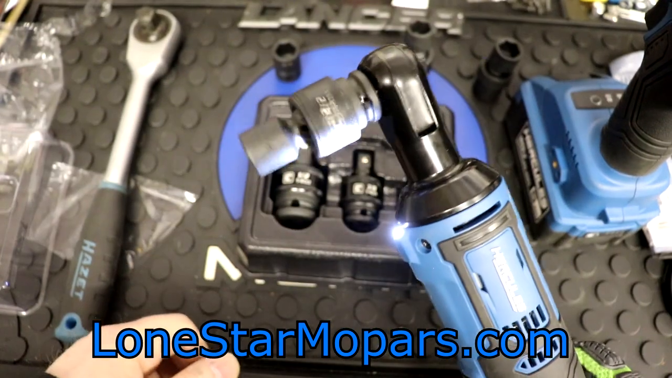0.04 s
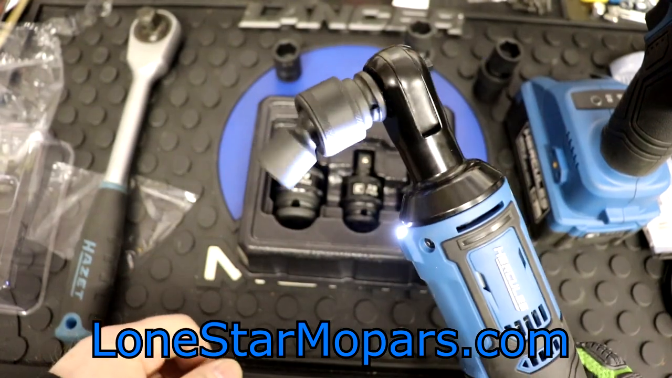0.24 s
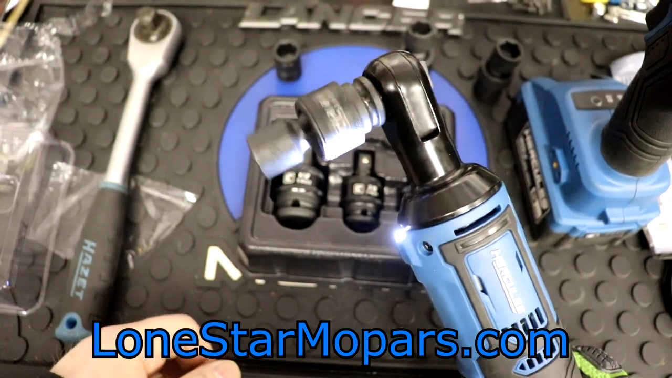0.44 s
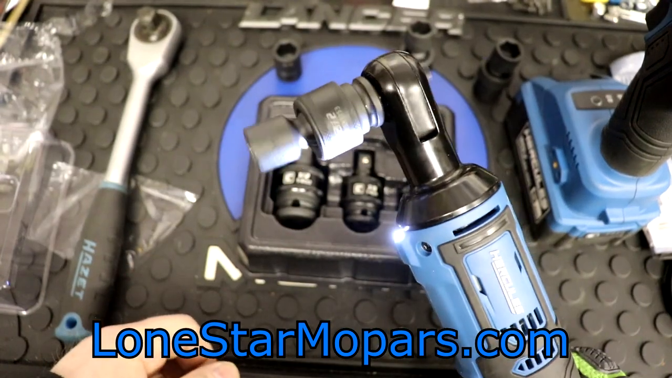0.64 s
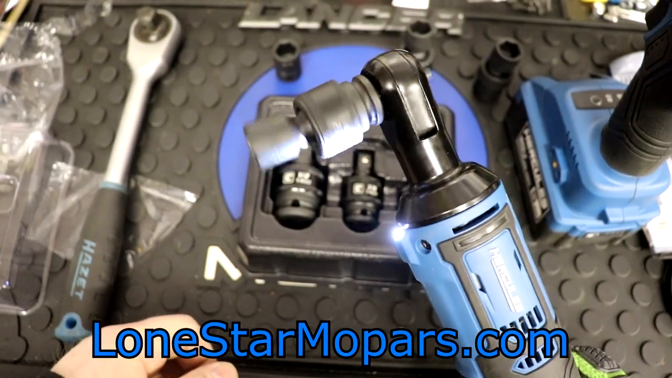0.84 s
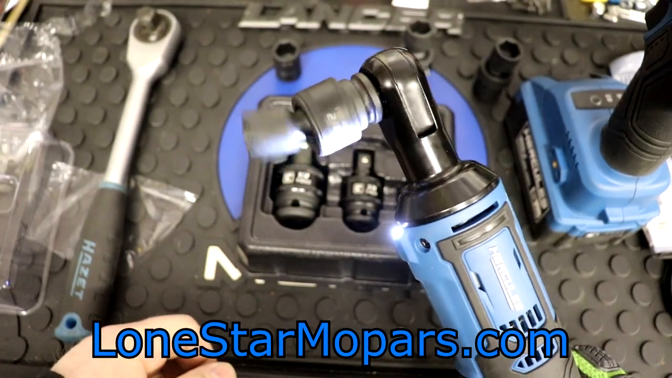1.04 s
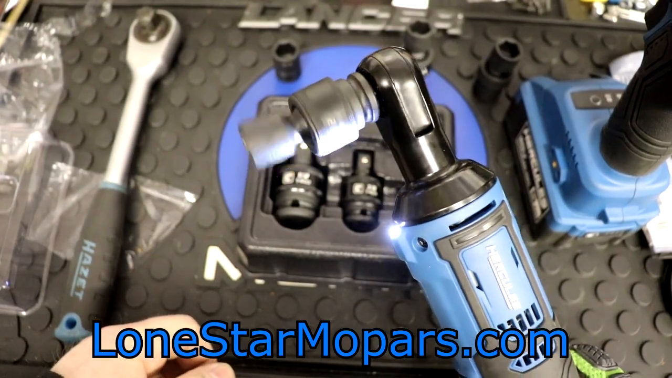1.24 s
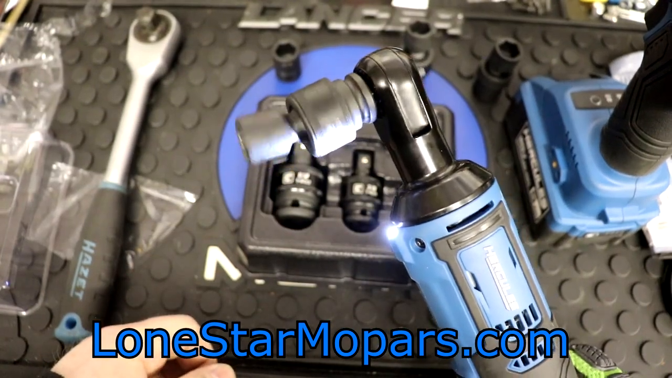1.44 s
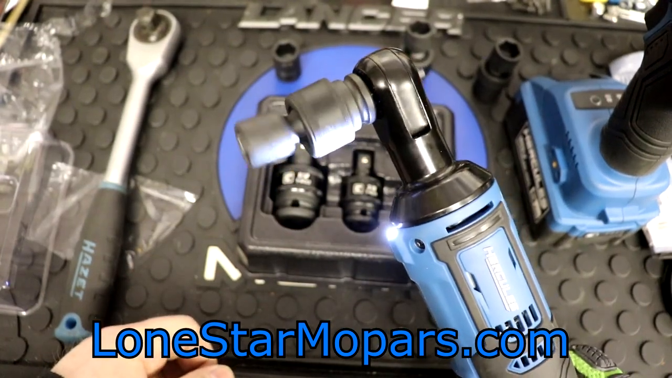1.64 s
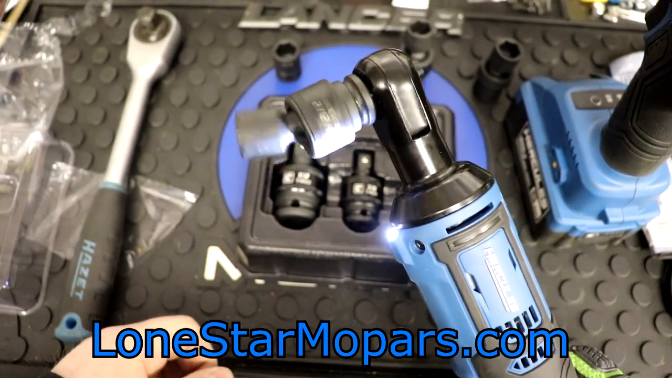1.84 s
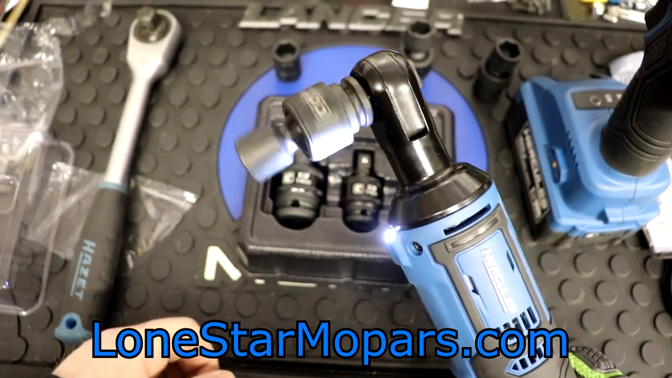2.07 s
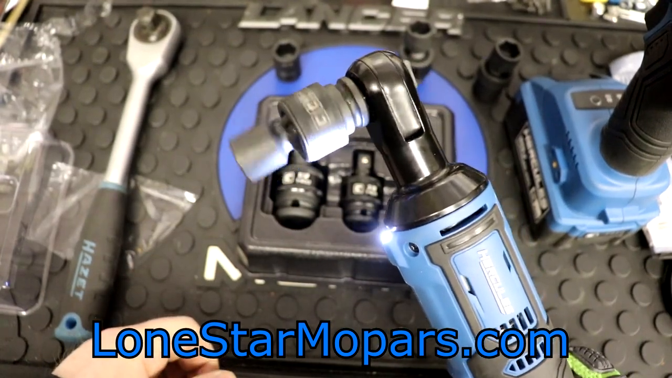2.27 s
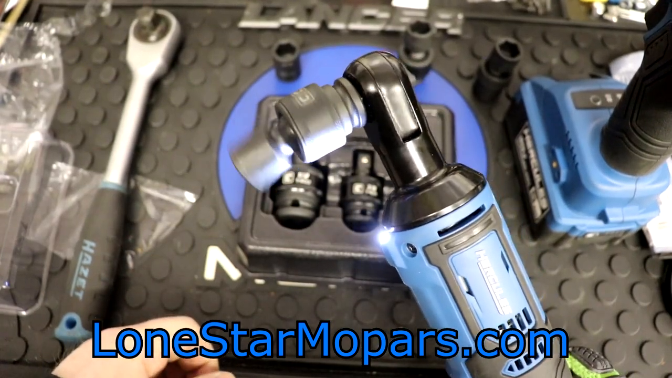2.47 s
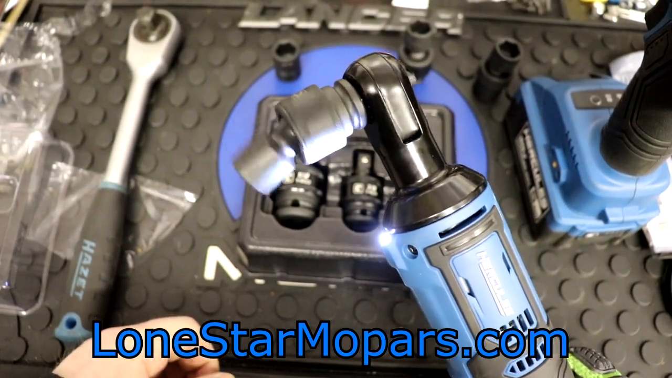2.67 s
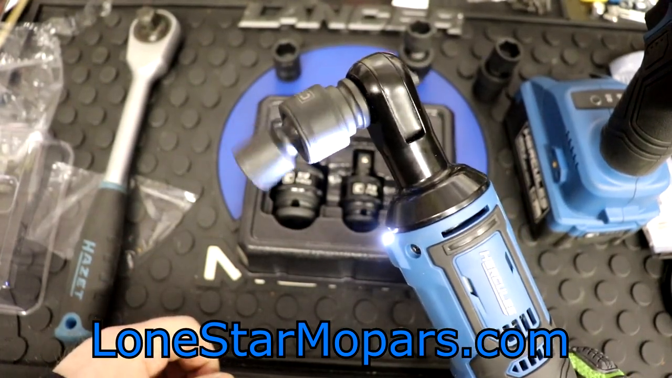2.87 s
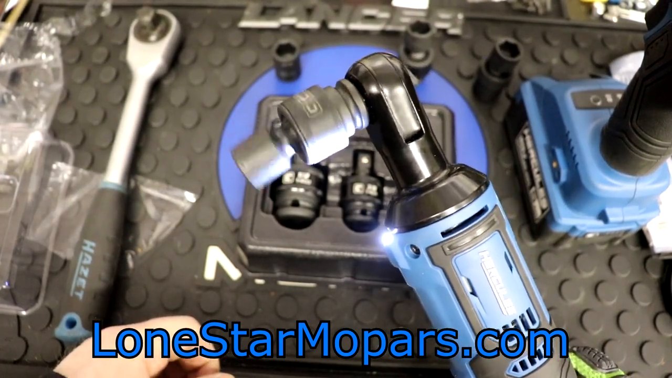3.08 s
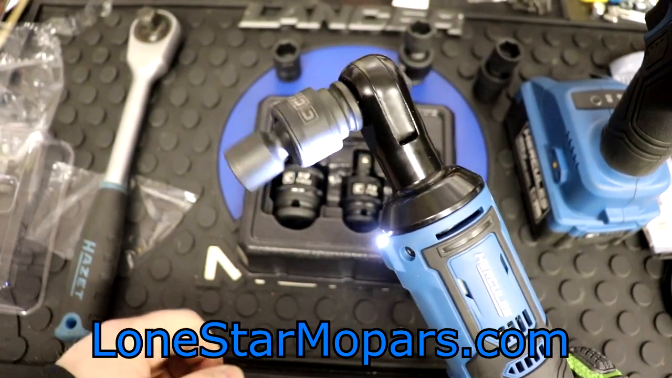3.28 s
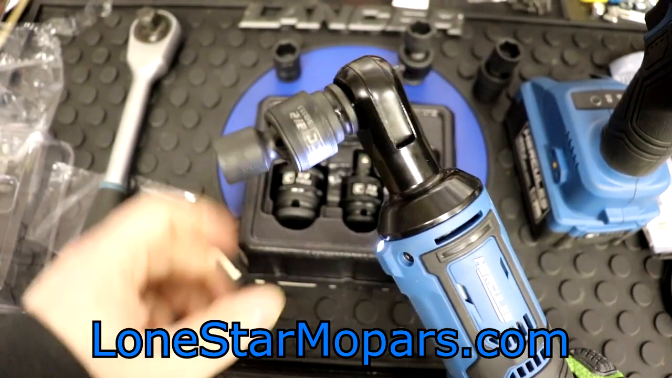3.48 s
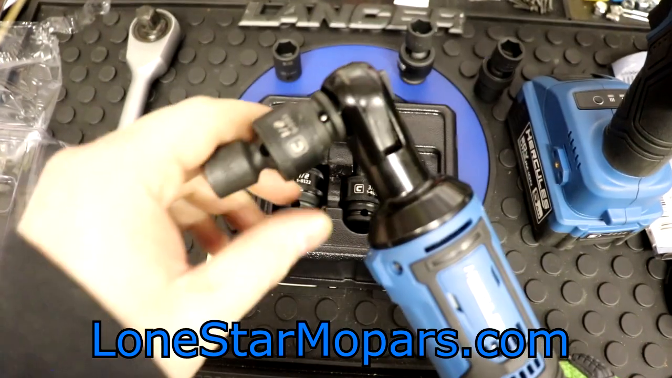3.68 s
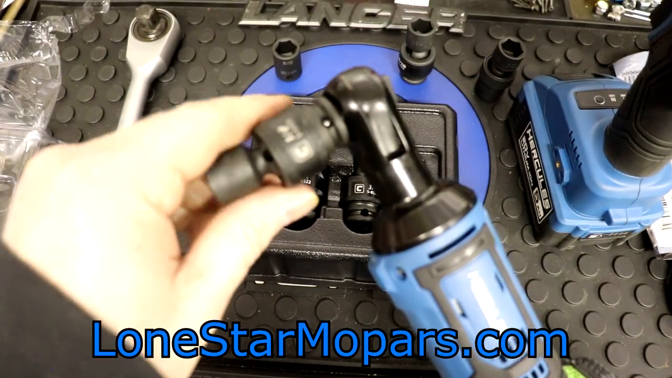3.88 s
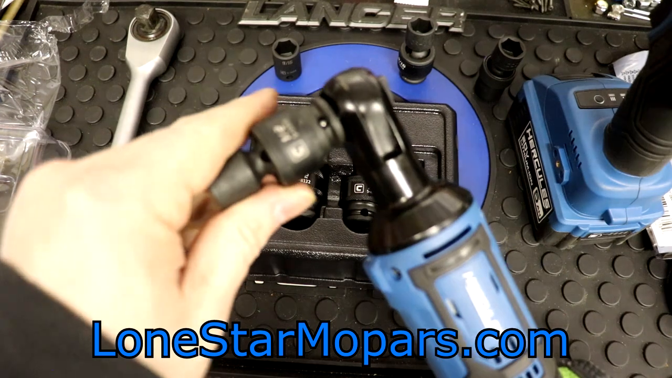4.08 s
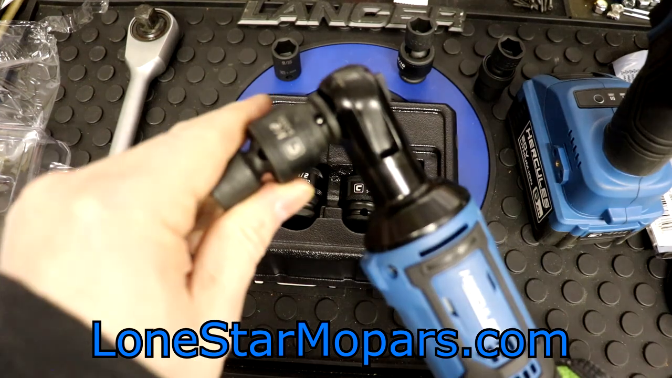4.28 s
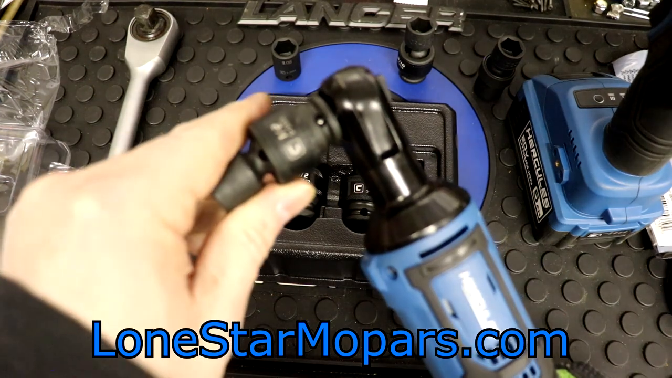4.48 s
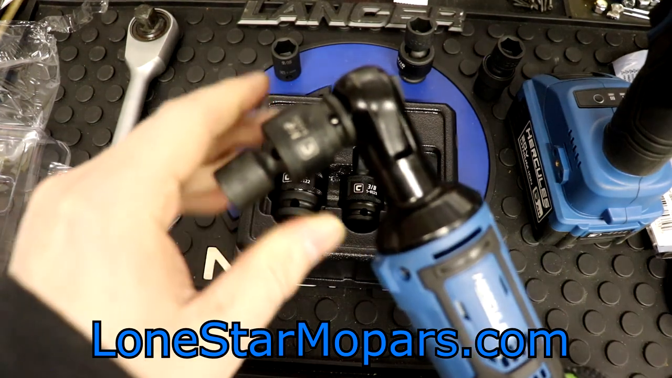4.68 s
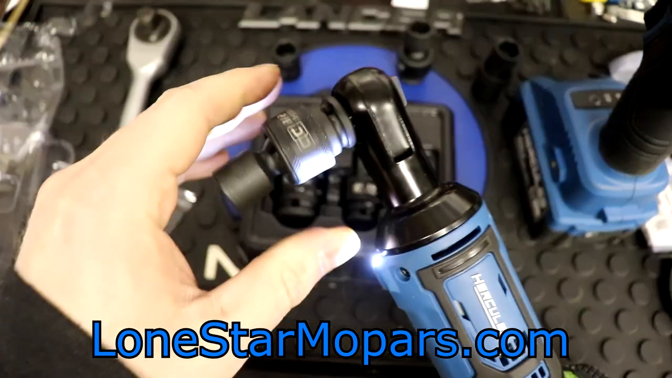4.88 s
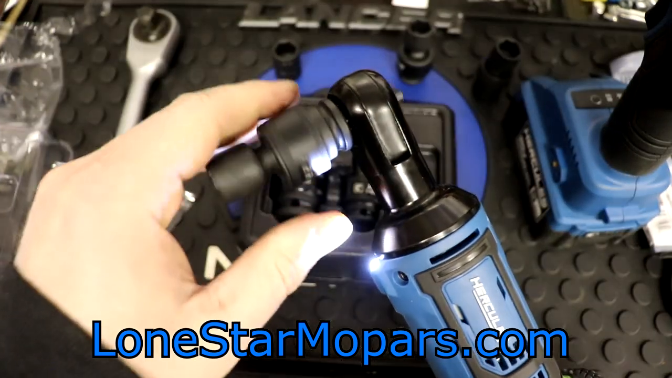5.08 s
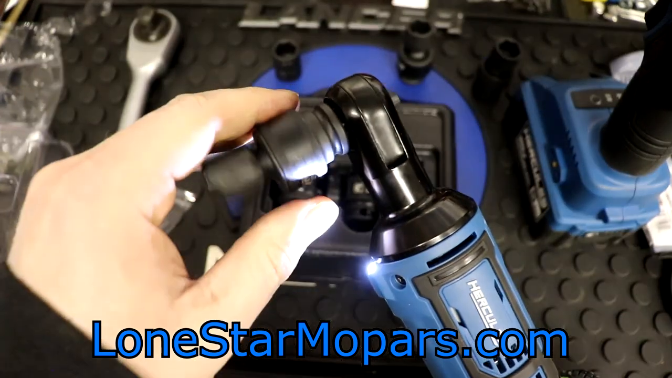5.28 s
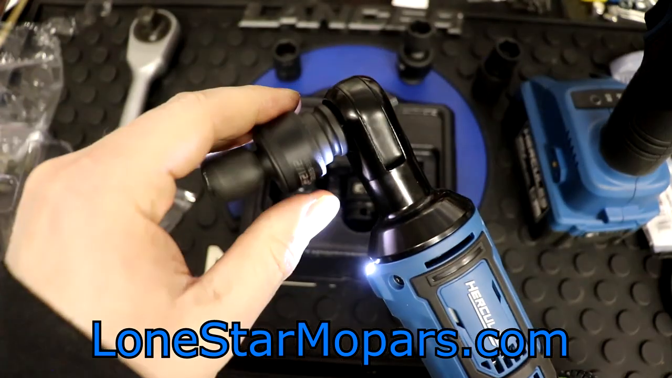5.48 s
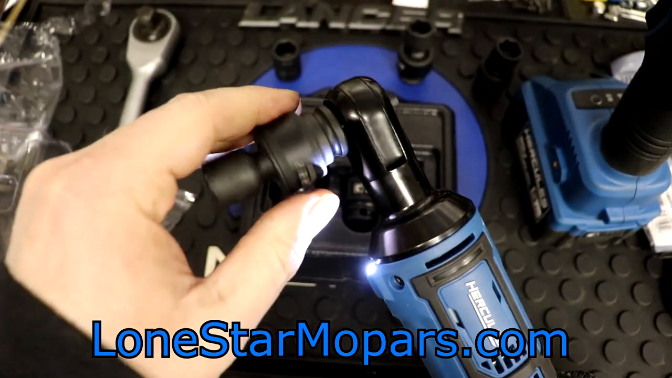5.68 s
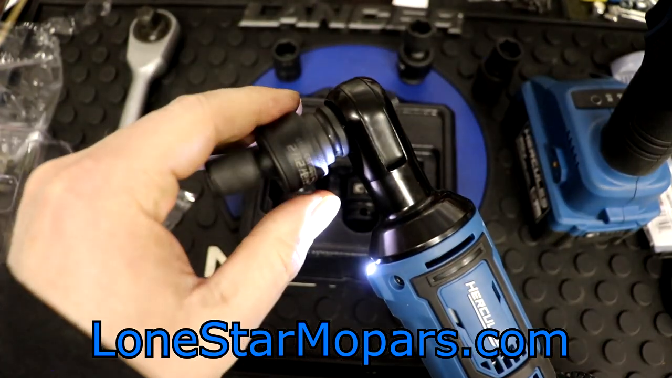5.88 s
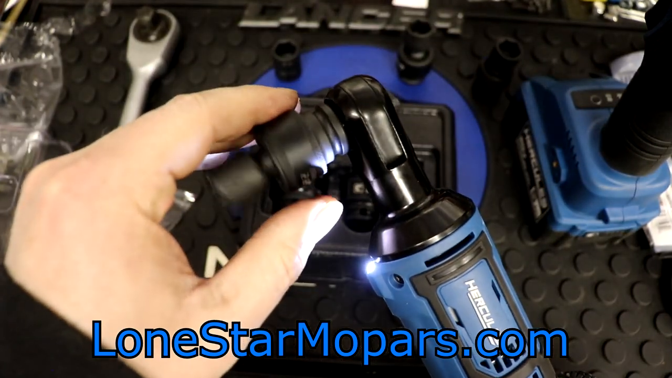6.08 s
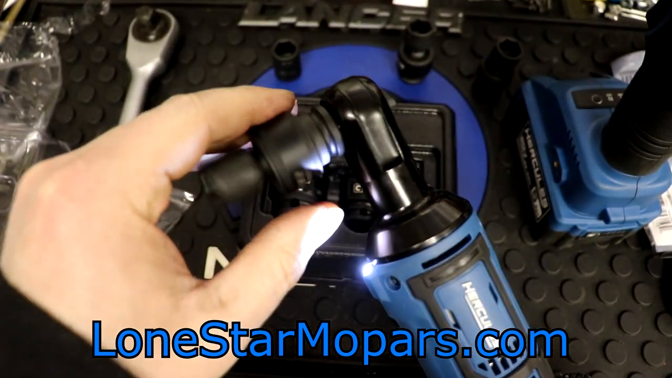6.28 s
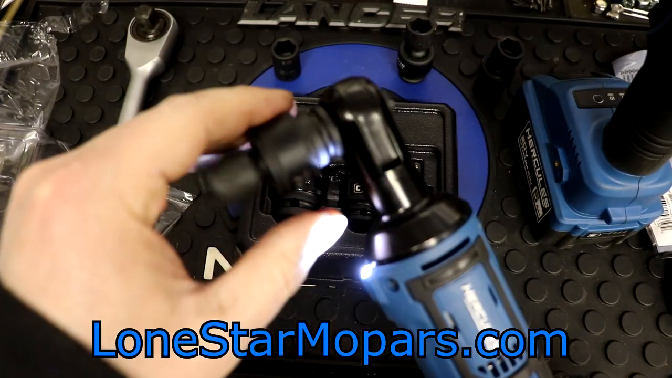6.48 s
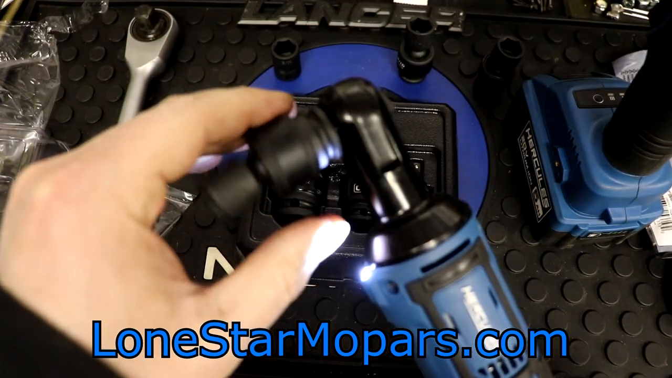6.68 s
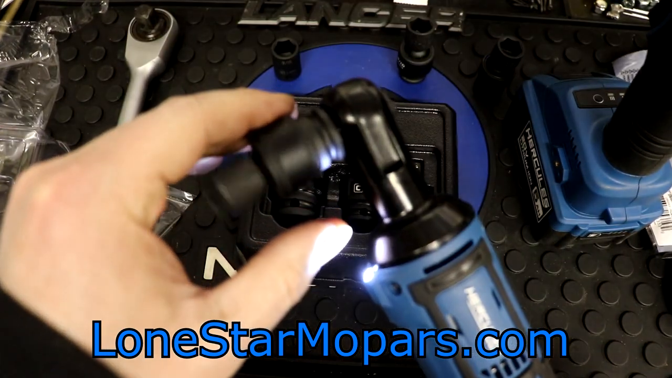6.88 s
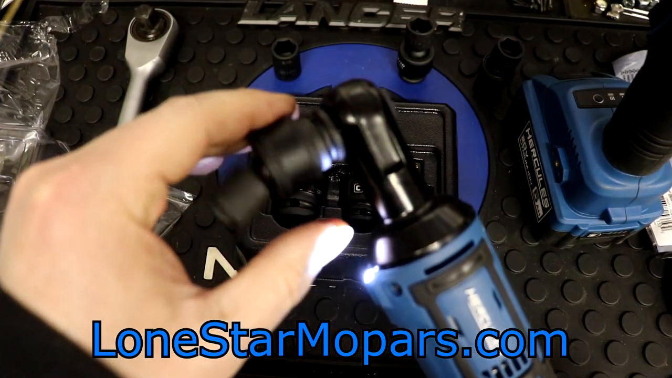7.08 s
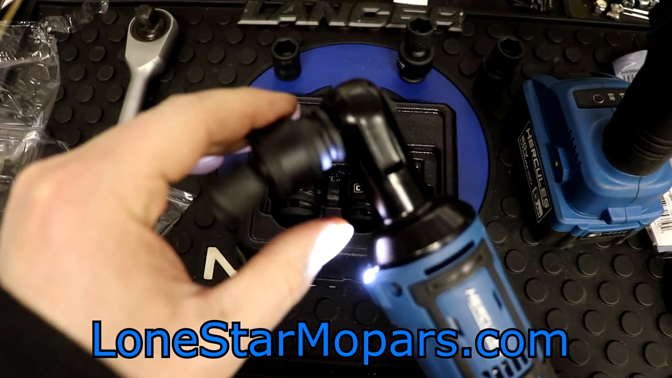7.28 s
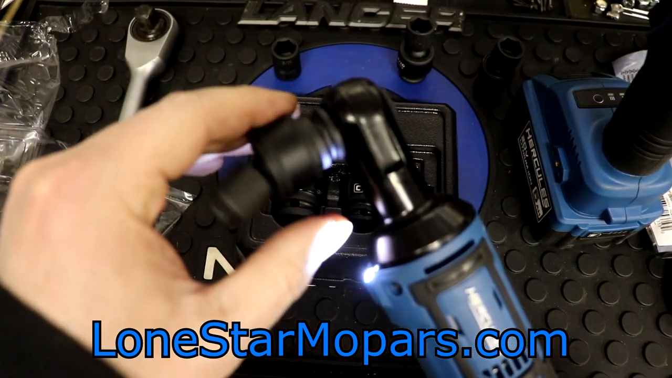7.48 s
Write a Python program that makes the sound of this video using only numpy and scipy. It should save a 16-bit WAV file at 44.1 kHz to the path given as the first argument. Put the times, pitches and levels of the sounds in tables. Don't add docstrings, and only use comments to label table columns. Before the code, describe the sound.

A power ratchet spins a loose jointed socket on a workbench: coarse buzzing near 75 strokes a second, pulsing about five times a second, with steel ticks and dull low knocks, stronger on one side or the other. Part throttle whine and chirps open it. A quiet gap holds soft skin friction and a plastic click, then a jolting restart runs on. Close stereo microphone, short room echo.

```python
import sys
import numpy as np
from scipy import signal
from scipy.fft import rfft, irfft, next_fast_len
from scipy.io import wavfile
from scipy.ndimage import uniform_filter1d

SR = 44100
rng = np.random.default_rng(int(sys.argv[2]) if len(sys.argv) > 2 else 0)


def undo_db(level):
    steps = np.asarray(level, float) / 20
    return 10 ** steps


def inscribe(sig):
    pcm = np.round(np.clip(np.atleast_2d(sig).T, -1, 1) * 32767)
    wavfile.write(sys.argv[1], SR, pcm.astype(np.int16))


N = 332021

CRANK_HZ = 75.35
TICK_TURN = 0.4
# start_s, stop_s, gear_rattle_db, pawl_hiss_db
TRIGGER_PULLS = [
    (-1.0, 3.56, -25.6, -27.5),
    (4.886, 9.0, -26.2, -28.6),
]


def rms_one(x):
    return x / np.sqrt(np.mean(x ** 2) + 1e-20)


def in_time(rows, outside=None):
    s, *columns = np.transpose(rows)
    return [np.interp(np.arange(N) / SR, s, column, outside, outside) for column in columns]


def at_hz(points, hz):
    point_hz, values = np.transpose(points)
    return np.interp(np.log(hz), np.log(point_hz), values)


def drift(rate):
    r = np.exp(-32 * np.pi * rate / SR)
    slow = signal.lfilter([1], [1, -2 * r, r * r], rng.standard_normal(N // 16 + 3002))[3000:]
    return np.interp(np.arange(N) / 16, np.arange(len(slow)), rms_one(slow))


def strikes(times, sizes):
    out = np.full(N, 1e-18)
    np.add.at(out, np.clip((np.asarray(times) * SR).astype(int), 0, N - 1), sizes)
    return out


def ring(clicks, hz, t60):
    r, w = undo_db(-60 / (t60 * SR)), 2 * np.pi * hz / SR
    return signal.lfilter([0, np.sin(w)], [1, -2 * r * np.cos(w), r * r], clicks)


def boost(x, hz, width, db):
    r = np.exp(-np.pi * width / SR)
    poles = [1, -2 * r * np.cos(2 * np.pi * hz / SR), r * r]
    top = signal.lfilter(np.array([1, 0, -1]) * (1 - r * r) / 2, poles, x)
    return x + (undo_db(db) - 1) * top


def coloured(envelope, spectrum, low_hz, high_hz, alike_gain=1.0, clicks=0):
    # pitch_hz, likeness (0 to 1)
    likeness = [(60, 0.48), (130, 0.17), (290, 1), (640, 0.76), (1410, 0.63), (3100, 0.45), (6820, 0.21),
                (15000, 0.52)]
    # pitch_hz, left_minus_right_db
    side_bias = [(60, -8), (110, 2.5), (200, -4.5), (380, 2), (700, 0), (1290, -0.5), (2380, -2.5),
                 (4400, 0), (8120, -1.0), (15000, -2.5)]
    edges = np.geomspace(low_hz, high_hz, num=int(2.5 * np.log2(high_hz / low_hz)) + 2)
    white = rng.standard_normal((2, 2, N)) * envelope
    white[:, 0] += clicks
    out = 0
    for k, (low, high) in enumerate(zip(edges, edges[1:])):
        band = signal.butter(2, [low, high], "band", fs=SR, output="sos")
        pair = signal.sosfilt(band, white[k % 2])
        hz = np.sqrt(low * high)
        alike = np.clip(alike_gain * at_hz(likeness, hz), 0, 1)
        gain = undo_db(at_hz(spectrum, hz) + at_hz(side_bias, hz) / 2 * np.array([[1], [-1]]))
        out = out + (gain * np.sqrt([1 + alike, 1 - alike]) * [[1, 1], [1, -1]]) @ pair
    return rms_one(out)


def crank_turns():
    # time_s, turns_ahead_of_full_speed
    crank_lead = [(0, 13.19), (0.1, 10.18), (0.118, 9.29), (0.344, 2.49), (0.413, 1.28), (0.446, 0.81),
                  (0.6, 0.09), (1.2, 0.02), (2.0, 0.35), (3.3, 0.26), (3.58, 0.1), (4.88, 1.2), (5.0, 0.3),
                  (5.1, 0.09), (5.5, 0.01), (6.3, -0.05), (7.1, 0.05), (7.53, 0.07)]
    return np.arange(N) / SR * CRANK_HZ + in_time(crank_lead)[0]


def lugging():
    return np.clip((72 - np.gradient(crank_turns()) * SR) / 15, 0, 1)


def trigger():
    spin_up_s, pawl_catch_s, spin_up_power = 0.042, 0.012, 1.5
    jolt_db, jolt_fade_s = 8.0, 0.065
    ease_s, ease_db, brake_s = 0.15, -4.5, 0.012
    surge_s, surge_db, surge_width_s = 0.41, 3.0, 0.1
    t = np.arange(N) / SR
    gear_db, pawl_db = np.full(N, -120.0), np.full(N, -120.0)
    for start, stop, gear, pawl in TRIGGER_PULLS:
        caught = t - start - spin_up_s
        shape = jolt_db * np.exp(-np.maximum(caught, 0) / jolt_fade_s)
        shape = shape + np.interp(t, [stop - ease_s, stop, stop + brake_s], [0, ease_db, -25])
        on = (t > start) & (t < stop + brake_s)
        spin_up_db = 20 * spin_up_power * np.log10(np.clip(1 + caught / spin_up_s, 1e-3, 1))
        catch_db = np.interp(caught, [-spin_up_s, -pawl_catch_s, 0], [-40, -24, 0])
        gear_db[on] = (gear + shape + spin_up_db)[on]
        pawl_db[on] = (pawl + shape + catch_db)[on]
    surge = surge_db * np.exp(-.5 * ((t - surge_s) / surge_width_s) ** 2)
    return gear_db + surge, pawl_db + surge / 2


def swing():
    # turns_per_s, time_of_one_swing_s
    socket_spin = [
        (5.13, 1.765),
        (4.92, 6.21),
    ]
    sharpness = 1.5
    t = np.arange(N) / SR
    run = (t > TRIGGER_PULLS[1][0]).astype(int)
    rate, at = np.array(socket_spin)[run].T
    return np.exp(sharpness * (np.cos(2 * np.pi * rate * (t - at)) - 1))


def contacts(turns, stroke, low_hz, high_hz, depth, per_s, spread_db, decay_s, smooth, turn_db, click_db):
    # pitch_hz, level_db (per Hz)
    housing = [(59, -48), (100, -37), (255, -25), (308, -13.5), (415, -21), (524, -8.5), (570, -8),
               (1060, -10), (3190, -1.5), (3620, -1.5), (7940, -7), (10900, -6), (12400, -11), (14700, -11),
               (16000, -16)]
    phase, db = np.transpose(stroke)
    force = rng.standard_normal(int(N / SR * CRANK_HZ) + 20)[(turns + .3).astype(int)]
    bite = undo_db(depth * np.interp(turns % 1, phase, db, period=1) + turn_db * force)
    hit = rng.random(N) < per_s / SR
    sizes = bite * undo_db(spread_db * np.minimum(rng.exponential(1, N), 4)) * hit
    tails = rms_one(signal.lfilter([1], [1, -np.exp(-1 / (decay_s * SR))], sizes)) + smooth * bite
    clicks = undo_db(click_db) * rms_one(sizes * rng.choice([-1, 1], N))
    return coloured(tails, housing, low_hz, high_hz, 1.17, clicks)


def squeal(turns):
    # time_s, boost_db, length_s
    loud_chirps = [(0.023, 6, .003), (0.03, 7, 0.0021), (0.043, 17.5, 0.0044), (0.202, 9, 0.0037),
                   (0.218, 6, .004), (0.249, 18, 0.0036), (.268, 6, .004), (0.307, 1, .003),
                   (4.982, 14, 0.0028), (5.012, 12, 0.003), (5.025, 16, 0.0026), (5.152, 11, .005)]
    t = np.arange(N) / SR
    hz = 2820 + 330 * drift(120.2) + 200 * np.sin(2 * np.pi * (turns - .1))
    loaded = np.clip(np.cos(2 * np.pi * (turns - .05)) + .3, 0, None)
    usual = rms_one(loaded * undo_db(3.5 * drift(150)))
    loud, rise = 0, 0
    for s, db, length in loud_chirps:
        hump = np.exp(-.5 * ((t - s) / length) ** 2)
        loud = loud + undo_db(db) * hump
        rise = rise + hump * (.4 + (t - s) / length)
    loud = loud * undo_db(3.0 * drift(500))
    return (usual + loud) * np.sin(2 * np.pi * np.cumsum(hz + 450 * rise) / SR)


def ratchet():
    # phase_turns, level_db
    gear_stroke = [(0, 4), (.1, 6.5), (.3, 3.5), (.5, 1.5), (.65, 3.5), (.72, 4), (.82, 8.5), (.92, 6)]
    pawl_stroke = [(0, 0), (.2, 4), (.28, 0), (.35, 5), (.41, 5.5), (.5, 1), (.58, 3.5), (.65, 5),
                   (.8, 2.5), (.95, -1.5)]
    # pitch_hz, width_hz, boost_db
    ringing_parts = [(519.7, 46, 4.5), (309.4, 20, 4), (2625, 220, 3.5), (3196, 110, 3), (4555, 390, 3.3),
                     (5470, 330, 2), (11970, 420, 4.5), (12960, 1070, 7)]
    swing_pawl_db, swing_gear_db, uneven_db = 4.0, 0.9, 0.35
    hush_db, burst_db, burst_turns = -4.0, 8.0, 0.22
    turns = crank_turns()
    gear_db, pawl_db = trigger()
    gear_db = gear_db + swing_gear_db * swing() + uneven_db * drift(12.0)
    pawl_db = pawl_db + swing_pawl_db * swing() + uneven_db * drift(12.0)
    burst = np.exp(-((turns - TICK_TURN) % 1) / burst_turns)
    pawl_db += lugging() * (hush_db + burst_db * burst)
    gears = contacts(turns, gear_stroke, 100, 8430, depth=1.44, per_s=900, spread_db=3.6,
                     decay_s=0.00058, smooth=0.91, turn_db=0.63, click_db=-1.0)
    pawl = contacts(turns, pawl_stroke, 8650, 16400, depth=0.89, per_s=1100, spread_db=4.1,
                    decay_s=0.00082, smooth=.5, turn_db=0.47, click_db=-1.5)
    pawl[0] = np.roll(pawl[0], 3)
    out = undo_db(gear_db + 1.5) * gears + undo_db(pawl_db + 2.5) * pawl
    for hz, width, db in ringing_parts:
        out = boost(out, hz, width, db)
    return out + undo_db(gear_db - 7.4) * squeal(turns) * undo_db(np.array([[-1.5], [.8]]))


def light_ticks():
    chance, level_db, lug_db, spread_db = 0.12, -10.0, 4.0, 3.5
    at = np.flatnonzero(np.diff(np.floor(crank_turns() - TICK_TURN)))
    luck, lug = rng.uniform(0, 1, (len(at), 2)), lugging()[at]
    drops = luck[:, 0] < lug + chance * (.4 + 2 * swing()[at])
    heard = drops & (trigger()[1][at] > -40)
    peak_db = level_db + lug_db * lug + spread_db * (2 * luck[:, 1] - 1) * 1.7
    return np.c_[at / SR, peak_db][heard]


def ticks():
    # time_s, peak_db
    hard_ticks = [(0.0488, 2), (0.0713, 2.5), (0.1226, 0), (0.1448, -5), (0.1705, -4.5), (0.1934, -7),
                  (0.322, -3), (0.347, -6), (0.4306, -1.5), (0.488, -5), (0.8473, -5), (1.7664, -4),
                  (2.2366, 1), (2.2631, -4), (2.3495, -4.5), (2.4074, -5), (2.5097, -5.5), (2.5583, -4),
                  (2.8207, -2), (3.0328, -4), (3.2316, -5), (3.3322, -5), (3.5558, -4.5), (4.926, 6),
                  (4.9321, 3), (4.953, 3), (4.9786, -1), (5.5058, -3), (7.0518, -5)]
    # pitch_hz, level_db, t60_s
    steel_modes = [(9800, -4, .003), (11000, -4, .003), (11900, 0, .007), (12700, 0, .004),
                   (13600, -2, .003), (14800, -4, .002), (3000, -14, .005), (5200, -13, .003)]
    s, peak_db = np.r_[hard_ticks, light_ticks()].T
    luck_db = 2 * rng.standard_normal((len(s), len(steel_modes)))
    out = 0
    for k, (hz, db, t60) in enumerate(steel_modes):
        out = out + ring(strikes(s, undo_db(peak_db - 6.5 + db + luck_db[:, k])), hz, t60)
    return np.array([undo_db(-4.0) * np.roll(out, 3), out])


def motor():
    # time_s, level_db
    chop_level = [(0, -33.5), (.2, -33.5), (.335, -34.5), (.36, -78), (4.884, -89), (4.886, -25),
                  (4.92, -27), (4.95, -31), (5.0, -53)]
    chop_overtones = [0.5, -18, -24.5]
    # crank_multiple, full_speed_db, part_throttle_db
    crank_orders = [(4, -58, -70), (5, -59, -70), (6, -59, -70), (7, -51, -62), (8, -56, -62),
                    (13, -57, -41.5)]
    chop_hz = 4974
    t, turns = np.arange(N) / SR, crank_turns()
    chop = 0
    for k, db in enumerate(chop_overtones):
        chop = chop + undo_db(db) * np.sin(2 * np.pi * chop_hz * (k + 1) * t)
    smooth_turns = uniform_filter1d(turns, size=4000, mode="nearest")
    full = np.clip((np.gradient(smooth_turns) * SR - 50) / 20, 0, 1)
    hum = 0
    for k, fast_db, slow_db in crank_orders:
        level_db = full * fast_db + (1 - full) * slow_db + (0.8 + 3.6 * full) * drift(15)
        waver = (.3 + .7 * full) * drift(12.2)
        hum = hum + undo_db(level_db) * np.sin(2 * np.pi * k * turns + waver)
    running = undo_db(trigger()[0] + 25.5)
    return np.sqrt(2) * (undo_db(in_time(chop_level)[0] + 1.0 * drift(25)) * chop + running * hum)


def room(x):
    t60_s, wall_cut_hz = 0.34, 17000
    size = next_fast_len(N + SR)
    hz = np.arange(size // 2 + 1) * SR / size
    dull = 1 / (1 + (hz / wall_cut_hz) ** 2) ** 0.24
    out = []
    for side in range(2):
        echoes = 0
        for k, delay_s in enumerate(rng.uniform(.015, .045, 8)):
            loop = undo_db(-60 * delay_s / t60_s) * dull * np.exp(-2j * np.pi * hz * delay_s)
            echoes = echoes + loop / (1 - loop) * (-1) ** k
        out.append(irfft(rfft(x, size) * echoes, size)[:N])
    return np.array(out)


def shop():
    # pitch_hz, level_db (per Hz)
    vent_spectrum = [(18, -39), (30, -18.5), (64, -8), (184, -7.5), (295, -9.5), (364, -19), (394, -10.5),
                     (721, -19.5), (780, -17.5), (6050, -29), (16000, -41)]
    # time_s, level_db
    background = [(0.3, -66), (1.6, -61), (3.4, -62), (3.58, -72), (3.69, -56), (4.0, -61.5), (4.5, -61.5),
                  (5.2, -57), (6.85, -61), (6.97, -76)]
    # pitch_hz, level_db
    mains_lines = [(75.4, -68), (360.7, -64), (479.1, -69.5), (602.9, -79.5), (721.4, -69), (839.8, -72.5)]
    t, level_db = np.arange(N) / SR, in_time(background)[0]
    lines = 0
    for hz, db in mains_lines:
        line_db = db + 2.8 * drift(3.8) + (hz < 100) * (level_db + 60.5)
        lines = lines + np.sqrt(2) * undo_db(line_db) * np.sin(2 * np.pi * hz * t)
    rumble = coloured(1, vent_spectrum, 30.9, 16400, 0.76)
    return undo_db(level_db + 7.0 + 1.0 * drift(6.6)) * rumble + lines


def knocks():
    # time_s, left_peak_db, right_peak_db
    socket_knocks = [(1.0726, -19, 1), (1.4994, -43.5, -20), (1.7968, -41.5, -22), (2.0766, -44, -20.5),
                     (2.237, -20, -7), (2.2626, -24.5, -9), (2.8212, -27.5, -11.5), (3.0328, -20.5, 0.5),
                     (3.2318, -26, -11), (5.0655, -35, -11.5), (5.3585, -16, -16), (5.5056, -27, -12),
                     (5.6642, -13, -18), (5.705, -14, -16), (6.2603, -44.5, -22), (6.4353, -39.5, -24.5),
                     (6.7534, -34.5, -20.5), (6.8861, -26, -43), (6.9394, -26, -2), (7.4685, -33, -18)]
    s, left_db, right_db = np.transpose(socket_knocks)
    push = np.array([strikes(s, undo_db(left_db)), strikes(s, undo_db(right_db))])
    t = np.arange(400) / SR
    pulse = (1 - np.exp(-t / 0.000083)) * np.exp(-t / 0.0018)
    bass_cut = signal.butter(2, 130, "high", fs=SR, output="sos")
    pulse = signal.sosfilt(bass_cut, np.r_[pulse, np.zeros(2000)])
    return undo_db(1.5) * signal.fftconvolve(push, pulse[None] / pulse.max())[:, :N]


def rustle():
    # time_s, level_db
    hand_level = [(3.6, -64), (3.72, -61), (3.82, -62), (3.9, -58), (4.0, -64), (4.3, -72), (4.55, -61),
                  (4.7, -62), (4.88, -57)]
    band = signal.butter(1, [400, 2500], "band", fs=SR, output="sos")
    rub = signal.sosfilt(band, rng.standard_normal((2, N)))
    patchy = undo_db(in_time(hand_level, -120)[0] + 2.5 * drift(30))
    return patchy * rms_one(boost(rub, 2030, 150, 8.3))


def taps():
    # time_s, peak_db, shell_pitch_hz, top_hz
    touches = [(3.85, -50, 1710, 3000), (3.882, -34.5, 2450, 4960), (3.893, -40, 3600, 8000),
               (3.907, -36, 1730, 5000), (3.918, -44, 3920, 5000), (3.921, -36.5, 680, 1996),
               (4.650, -23.5, 2340, 5950), (4.653, -20, 780, 6940), (4.6525, -26, 1400, 6000),
               (4.654, -27, 3700, 6000), (4.813, -42, 2500, 6000)]
    ring_db, ring_cycles = -1.0, 13.0
    out, n = np.zeros(N), np.arange(1500)
    for s, db, hz, top_hz in touches:
        scratch = rng.standard_normal(1500) * np.exp(-n / (.0025 * SR))
        band = signal.butter(3, [450, top_hz], "band", fs=SR, output="sos")
        body = signal.sosfilt(band, scratch)
        shell = boost(ring(1.0 * (n == 0), hz, ring_cycles / hz), hz, hz / 3, 30)
        body = body / np.abs(body).max() + undo_db(ring_db) * shell / np.abs(shell).max()
        start = int(s * SR)
        out[start:start + len(body)] += undo_db(db) * body / np.abs(body).max()
    return out


def scene():
    tool, touch = ratchet() + ticks() + motor(), taps()
    echo = undo_db(-18) * room(tool.mean(axis=0) + undo_db(-6.0) * touch)
    return tool + touch + echo + knocks() + shop() + rustle()


def roll_off(x):
    return signal.sosfilt(signal.butter(12, 16740, fs=SR, output="sos"), x)


def record(dry):
    peak_db = 20 * np.log10(np.abs(dry).max(axis=0) + 1e-9)
    over_db = np.maximum(peak_db + 7.61, 0) * 0.38
    fall = 36.0 * np.arange(N) / SR
    held = np.maximum.accumulate(over_db + fall) - fall
    r = np.exp(-1 / (0.009 * SR))
    x = dry * undo_db(-signal.lfilter([1 - r], [1, -r], held))
    top_cut = signal.cheby2(22, 70, 16170, fs=SR, output="sos")
    return roll_off(signal.sosfilt(top_cut, np.clip(x, -1, 1)))


dry = scene()
out = record(dry)
inscribe(out)
```